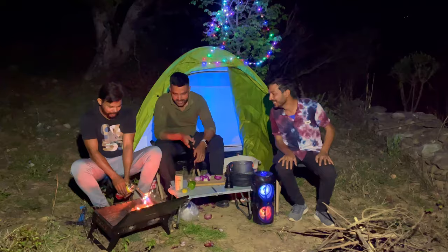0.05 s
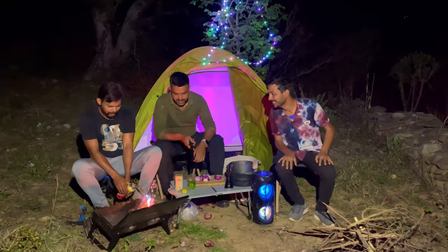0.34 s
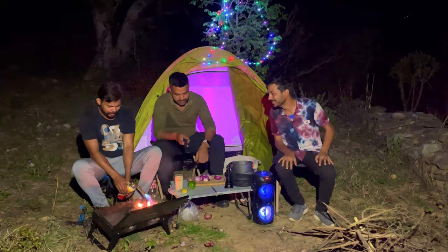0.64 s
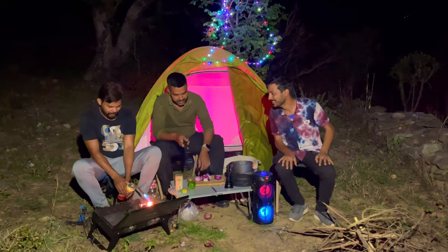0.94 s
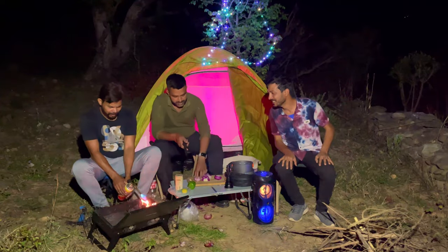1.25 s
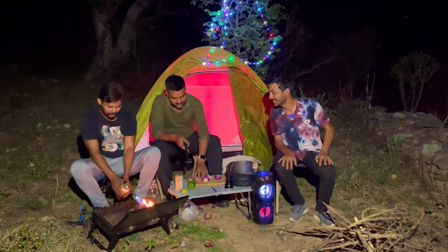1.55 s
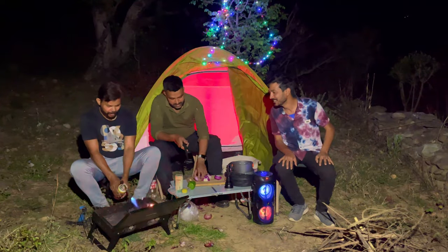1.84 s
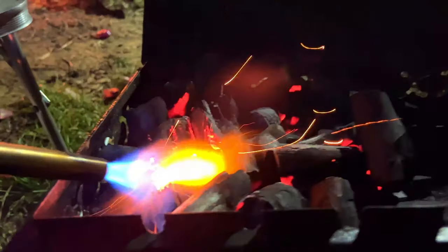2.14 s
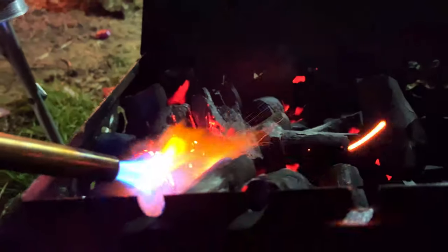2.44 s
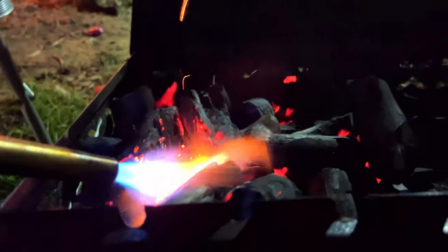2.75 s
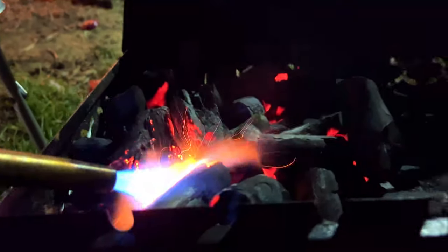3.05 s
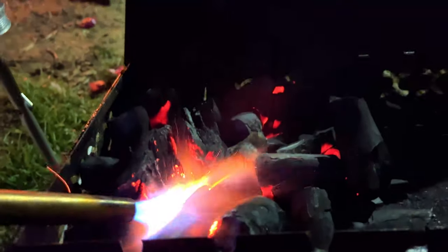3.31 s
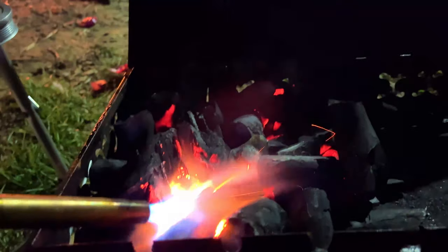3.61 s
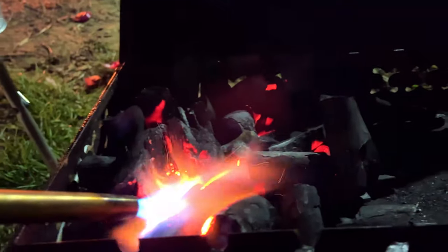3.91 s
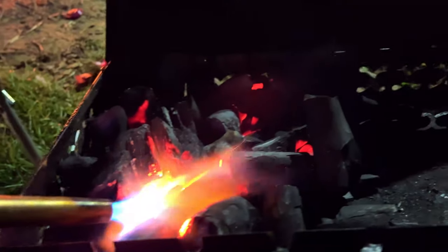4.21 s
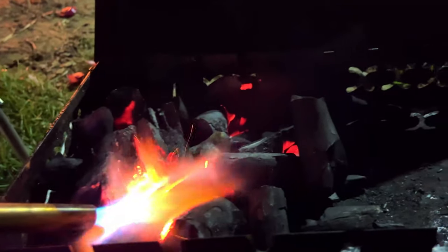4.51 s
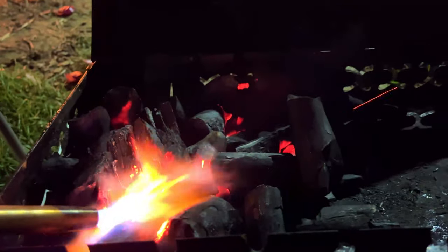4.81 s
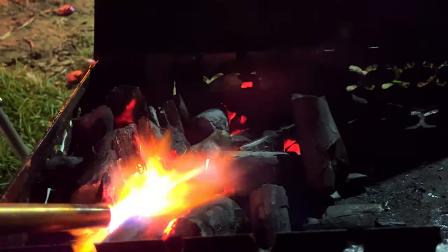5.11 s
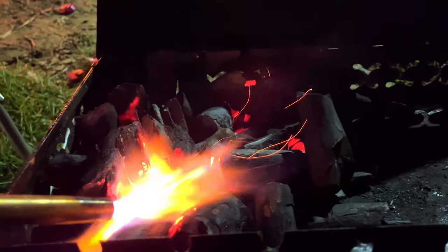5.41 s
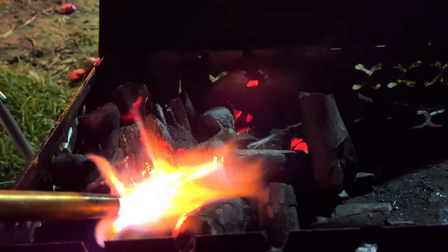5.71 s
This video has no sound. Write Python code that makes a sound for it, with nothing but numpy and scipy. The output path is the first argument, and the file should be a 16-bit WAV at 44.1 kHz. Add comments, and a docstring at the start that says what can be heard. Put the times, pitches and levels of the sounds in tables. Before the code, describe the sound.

A handheld gas torch blows into charcoal in a small grill outdoors. At first it is a few metres away: a moderate, fluttering roar with an airy rush and a thin, ringing gas hiss. It gives one soft low puff at about 0.45 seconds, then flares three times between 0.8 and 1.4 seconds. Just before 2 seconds the sound cuts to a brief silence and swells back quickly, now close and much louder. The deep, full roar slightly overloads the microphone, topped by a bright hiss and a faint breathy tone from the nozzle. Tiny sparks crackle off the charcoal throughout, with sharper snaps at about 2.7 and 3.8 seconds. From around 3.3 seconds the flame reaches deeper into the coals: the roar brightens, the rush grows and the ringing lessens. The blast continues until it stops at about 5.8 seconds.

```python
"""A handheld gas torch blows into charcoal in a small grill outdoors. At first it is a few metres away: the
turbulent flame roars, puffs once and flares, its blast rushes over the coals, and the gas jet hisses and rings
in the burner tube. The scene changes near 2 s and it is heard from close by, where the roar overloads the two-
port microphone. Sparks snap off the charcoal, and as the flame reaches deeper into the coals the roar
brightens, the rush grows and the tube rings less."""
import sys
import numpy as np
from scipy.fft import rfft, irfft, next_fast_len
from scipy.io import wavfile
from scipy.ndimage import map_coordinates

SR = 44100
rng = np.random.default_rng(int(sys.argv[2]) if len(sys.argv) > 2 else 0)


def bounce(signal):
    """Save signal as a 16-bit WAV file at the path given by the first command-line argument."""
    frames = np.transpose(np.atleast_2d(signal))
    limited = np.clip(frames, -1, 1)
    pcm = np.round(limited * 32767).astype(np.int16)
    wavfile.write(sys.argv[1], SR, pcm)


N = 254016
TIME = np.arange(N) / SR


def amp(db):
    """Amplitude ratio of a level in decibels."""
    return 10 ** (np.asarray(db) / 20)


def unit(x):
    """Normalisation to rms 1."""
    return x / np.sqrt(np.mean(x ** 2) + 1e-20)


def along(points, hz):
    """Interpolation of a table's columns on a log frequency axis."""
    freqs, *columns = np.transpose(points)
    return [np.interp(np.log(hz + 1), np.log(freqs + 1), c) for c in columns]


def curves(rows):
    """Linear interpolation of a table's columns in time."""
    times, *columns = np.transpose(rows)
    return [np.interp(TIME, times, c) for c in columns]


def swells(rows):
    """Superposition of Gaussian rises and dips in level, in dB."""
    return sum(db * np.exp(-((TIME - s) / half_width) ** 2) for s, half_width, db in rows)


def wobble(rate):
    """Smooth random modulation: a spline through rate knots a second."""
    knots = rng.standard_normal(int(N * rate / SR) + 4)
    return map_coordinates(knots, [TIME * rate])


def filtered(x, response):
    """Linear filtering: the spectrum of x times a frequency response."""
    size = next_fast_len(N + 8192)
    hz = np.fft.rfftfreq(size, 1 / SR)
    return irfft(rfft(x, size) * response(hz), size)[..., :N]


def colour(spectrum):
    """Frequency response of a spectral envelope."""
    return lambda hz: amp(along(spectrum, hz)[0])


def resonances(modes):
    """Modal superposition: the summed response of peaks with steep skirts."""
    return lambda hz: sum(amp(db) / (1 + ((hz - centre) / width) ** 2) ** 1.5
                          for centre, width, db in modes)


def turbulence(response, image):
    """Partial coherence: shared and opposed noise mix at two ports into stereo of rms 1."""
    size = next_fast_len(N)
    hz = np.fft.rfftfreq(size, 1 / SR)
    balance_db, lead, coherence = along(image, hz)
    angle = np.arccos(np.clip(coherence, 0, 1)) / 2
    shared, opposed = rfft(rng.standard_normal((2, size))) * [np.cos(angle), np.sin(angle)]
    ratio = amp(balance_db)
    left = (shared + opposed) * ratio * np.exp(1j * lead)
    ports = np.array([left, shared - opposed]) / np.hypot(ratio, 1)
    return unit(irfft(ports * response(hz), size)[:, :N])


def echo(x, delay_ms):
    """Propagation delay along a path of changing length."""
    n = np.arange(N)
    return np.array([np.interp(n - delay_ms * SR / 1e3, n, port) for port in x])


def scattered(x, count=5):
    """Interference: weak reflections off coals and walls ripple the spectrum, drifting with the hand."""
    drift = wobble(1.5)
    paths = rng.uniform([1.5, -.1], [10, .1], (count, 2))
    return x + sum(amp(-21) * echo(x, delay_ms + sway_ms * drift) for delay_ms, sway_ms in paths)


# Modes of the grill's box. Each row: frequency in Hz, half-width in Hz, relative level in dB.
GRILL_MODES = [(3160, 230, 0), (4350, 200, -5)]
# Stereo image of the distant grill, rush and flame. Each row: frequency in Hz, left over right in dB,
# left phase lead in radians, coherence from 0 to 1.
FAR_IMAGE = [(100.0, 0.5, -0.5, 1), (328, 1, 0.3, 0.98), (520.0, 2, 0.8, 1), (800.0, 3.5, -0.13, 0.87),
             (1300.0, 2.5, 0.7, 1), (2000.0, 2, 1.1, 0.83), (3020, 1, 0.63, 0.7), (4150, 0, 6.5, 0.217),
             (5030, 25, 2, 0.3), (5830, 16, 10, 1)]
def grill_box(peak_s=1.2, half_width_s=.24, peak_db=-48):
    """Cavity resonance: the box sounds briefly while the distant flame dips into it."""
    envelope = amp(peak_db) * np.exp(-((TIME - peak_s) / half_width_s) ** 2)
    return envelope * turbulence(resonances(GRILL_MODES), FAR_IMAGE)


# A puff of the flame. Each row: centre in seconds, pitch in Hz, envelope peak in dB.
PUFFS = [(.449, 75, -22)]
def puff(half_width_s=0.015):
    """A pressure pulse: a soft, low push of air about two cycles long."""
    return sum(amp(db) * np.exp(-((TIME - s) / half_width_s) ** 2) * np.sin(2 * np.pi * hz * (TIME - s))
               for s, hz, db in PUFFS)


# The loud sparks. Each row: start in seconds, relative level in dB.
SPARKS = [(2.6792, 6.5), (3.7973, 3)]
# Spectrum of a snap. Each row: frequency in Hz, gain in dB.
SNAP_SPECTRUM = [(2000, -28), (4300, 5), (7500, -8), (11000, -4), (15000, -14)]
def sparks(t60_s=0.0073, gain_db=-4, crackle_db=-15, count=50):
    """Impulsive fracture: charcoal bursts off in fast-decaying snaps, two loud among many faint."""
    snaps = np.zeros(N + SR)
    t = np.arange(SR // 10) / SR
    faint = [(NEAR_SPAN_S[0] + .15 + when * 3.6, crackle_db - 10 * softness)
             for when, softness in rng.random((count, 2))]
    for s, db in list(SPARKS) + faint:
        decay = amp(db + gain_db - 60 * t / t60_s)
        snaps[round(s * SR):][:len(t)] += decay * rng.standard_normal(len(t))
    return filtered(snaps, colour(SNAP_SPECTRUM))


# Spectrum of the gas hiss. Each row: frequency in Hz, relative density in dB.
HISS_SPECTRUM = [(3000, -30), (4500, -9), (5600, -3), (6500, -1), (7600, 1), (8300, -3), (10000, -2.5),
                 (11000, -3), (12400, -.5), (14200, .5), (15300, -5)]
# Upper and lower tube modes. Each row: frequency in Hz, half-width in Hz, relative level in dB.
UPPER_MODES = [(9180, 380, 4.5), (11520, 610, -1), (15100, 500, -16)]
LOWER_MODES = [(6024, 230, 0)]
# The gas spurts or sinks. Each row: centre in seconds, half-width in seconds, change in dB.
SPURTS = [(.15, 0.045, 3.5), (.3, 0.086, -6), (.76, 0.059, 2), (1.85, .12, -1), (3.55, .3, -0.1),
          (5.05, 0.22, 0.5), (5.75, .25, -2.5)]
# Stereo image of the jet, with the columns of FAR_IMAGE.
JET_IMAGE = [(4070.0, 8.5, -0.05, 0.75), (5000.0, 5.5, 0.13, 0.28), (6000.0, -0.5, -0.87, 0.83),
             (7200.0, 0.5, -1.88, 0.9), (7900.0, 0.0, -3.09, 0.91), (8650.0, 0.0, -3.16, 0.93),
             (9200.0, -0.5, -3.82, 0.84), (10200.0, 0.0, -4.84, 0.56), (11300.0, 0.0, -6.21, 0.94),
             (12300.0, 0.0, -6.29, 0.97), (13400.0, -0.5, -7.47, 0.82), (14600.0, 0.0, -9.14, 0.77),
             (15300.0, 0.0, -9.42, 0.99)]
def jet(modes, hiss_db, ring_db, upper_db, lower_db, sputter_db):
    """Jet noise: gas hisses from the nozzle, sputtering slightly, and excites the burner tube's modes."""
    hiss_db = hiss_db + swells(SPURTS)
    hiss = amp(hiss_db) * turbulence(colour(HISS_SPECTRUM), JET_IMAGE)
    tube = amp(ring_db) * turbulence(resonances(modes), JET_IMAGE)
    upper = amp(hiss_db + upper_db) * turbulence(resonances(UPPER_MODES), JET_IMAGE)
    lower = amp(hiss_db + lower_db) * turbulence(resonances(LOWER_MODES), JET_IMAGE)
    sputter = amp(sputter_db * unit(wobble(14) + wobble(110)))
    return (hiss + tube + upper + lower) * sputter


# Tube modes heard from afar. Each row: frequency in Hz, half-width in Hz, relative level in dB.
FAR_TUBE_MODES = [(2560, 100, 4.5), (3810, 180, -4.5), (7140, 330, 3.5)]
def far_jet():
    """Forced resonance: the distant tube's ringing partly follows the spurts of gas."""
    ring_db = -40 + 0.47 * swells(SPURTS)
    return jet(FAR_TUBE_MODES, hiss_db=-42.5, ring_db=ring_db,
               upper_db=-3.5, lower_db=-4.5, sputter_db=0.8)


# Tube modes heard close by. Each row: frequency in Hz, half-width in Hz, relative level in dB.
NEAR_TUBE_MODES = [(7180, 490, -1), (13300, 760, -6)]
# The burner's aim. Each row: time in seconds, level of the upper modes in dB relative to the hiss.
AIM = [(2.1, -20), (2.8, -13), (3.35, -2.5), (3.9, -3), (4.3, -7), (4.8, -14), (5.25, -6), (5.75, -10)]
def near_jet(depth):
    """Directivity: the upper modes grow as the mouth turns to the listener; the rest fade with depth."""
    aim_db, = curves(AIM)
    return jet(NEAR_TUBE_MODES, hiss_db=-20, ring_db=-17 - 3.9 * depth,
               upper_db=aim_db, lower_db=-5 - 7.5 * depth, sputter_db=0.84)


# The nozzle's mode. Each row: frequency in Hz, half-width in Hz, relative level in dB.
NOZZLE_MODES = [(4080, 106, 0)]
def nozzle(depth):
    """Narrow resonance: the nozzle gives a wavering, breathy tone that weakens with depth."""
    level_db = -28 - 2.8 * depth + 1.6 * wobble(14)
    return amp(level_db) * turbulence(resonances(NOZZLE_MODES), JET_IMAGE)


def blast(response, image, level_db, rough_db):
    """Flow noise: hot gas tears over the edges of the coals with a rough, rapid flutter."""
    return amp(level_db + rough_db * wobble(160)) * turbulence(response, image)


# Spectrum of the distant rush. Each row: frequency in Hz, relative density in dB.
FAR_RUSH_SPECTRUM = [(900, -51), (1400, -3), (1900, 4), (2600, -9), (3100, -6), (3800, -11), (4400, -12),
                     (5200, -12), (6300, -9), (8000, -50)]
# The flame flares or falters. Each row: centre in seconds, half-width in seconds, change in dB.
FLARES = [(.78, 0.11, 2.5), (1.1, 0.13, 3.5), (1.38, 0.079, 4.5), (1.82, 0.036, -2), (2.72, 0.071, 0),
          (3.16, 0.043, -2.5), (3.27, 0.055, 1)]
def far_rush():
    """Amplitude modulation: the distant rush rises and falls with the flares."""
    return blast(colour(FAR_RUSH_SPECTRUM), FAR_IMAGE, -38 + 0.98 * swells(FLARES), rough_db=1.6)


# Spectrum of the close rush. Each row: frequency in Hz, relative density in dB.
NEAR_RUSH_SPECTRUM = [(1100, -44), (1800, -2), (2200, -2), (2700, -2.5), (3400, 0), (3900, -1.5),
                      (4600, -2.5), (5300, -9.5), (6300, -10), (8000, -50)]
# The hollow between the coals. Each row: frequency in Hz, half-width in Hz, relative level in dB.
HOLLOW_MODES = [(2707, 460, 0)]
# Stereo image of the close rush, with the columns of FAR_IMAGE.
RUSH_IMAGE = [(1830, 7.0, 1.5, 0.05), (2100, 3.5, -1, 0.91), (2700, 1.7, 1.06, 0.66),
              (3300, 7.9, 1.45, 0.55), (3880, 11.5, 1.5, 0.134), (4184, 8.8, -4, 0.85),
              (4570, 6.9, 1.25, 0.64), (5400.0, 2.0, 0, 0.44)]
def near_rush(depth):
    """Flow noise and cavity resonance: a deeper flame drives the coals and their hollow harder."""
    rush = blast(colour(NEAR_RUSH_SPECTRUM), RUSH_IMAGE, -24.5 + 4.4 * depth, rough_db=0.95)
    hollow_db = -33 + 14 * np.minimum(depth, .65)
    return rush + blast(resonances(HOLLOW_MODES), RUSH_IMAGE, hollow_db, rough_db=1.0)


def flame(spectrum, image, roar_db, bright_db, flutter_db, thinning, rumble_hz=260, top_hz=830):
    """Combustion noise flutters with the eddies; a brighter flame gains at the top and loses rumble."""
    roar = turbulence(colour(spectrum), image)
    rumble = filtered(roar, lambda hz: 1 / (1 + (hz / rumble_hz) ** 8))
    body = filtered(roar, lambda hz: 1 / (1 + (hz / top_hz) ** 8))
    middle, top = body - rumble, roar - body
    tilted = amp(-thinning * bright_db) * rumble + middle + amp(bright_db) * top
    return tilted * amp(roar_db + flutter_db * wobble(45))


# Spectrum of the distant roar. Each row: frequency in Hz, relative density in dB.
FAR_ROAR_SPECTRUM = [(22, -27), (45, -11.5), (80, -4.5), (160, -1.5), (310, -1.5), (400, -9), (500, -9.5),
                     (565, -16), (660, -1.5), (950, 2), (1200, -7.5), (1500, -18), (2200, -60)]
# The roar's upper edge. Each row: frequency in Hz, half-width in Hz, relative level in dB.
EDGE_BAND = [(1157, 220, 0)]
# The flame's brightness. Each row: time in seconds, gain of the upper edge in dB.
FAR_BRIGHTNESS = [(.4, 6.5), (1.1, -5.5), (1.6, -9), (1.9, 0)]
def far_flame():
    """Spectral tilt: the distant roar dulls and its edge fades as the flame is lowered into the grill."""
    roar_db = -26.5 + swells(FLARES)
    bright_db, = curves(FAR_BRIGHTNESS)
    roar = flame(FAR_ROAR_SPECTRUM, FAR_IMAGE, roar_db, 0.15 * bright_db, flutter_db=0.5, thinning=0.091)
    edge = amp(roar_db - 14 + bright_db) * turbulence(resonances(EDGE_BAND), FAR_IMAGE)
    return roar, edge


# Spectrum of the close roar. Each row: frequency in Hz, relative density in dB.
NEAR_ROAR_SPECTRUM = [(22, -39), (40, -18), (72, -4), (150, -0.3), (240, -1.5), (305, 0), (360, -2.5),
                      (490, -3.5), (670, -1.5), (950, -9), (1250, -9), (1550, -16.5), (1850, -31.5),
                      (2600, -63)]
# Stereo image of the close roar, with the columns of FAR_IMAGE.
ROAR_IMAGE = [(100.0, 0.5, 0.12, 1), (334, 1.6, 0.34, 0.99), (493, -0.7, 0.45, 0.96),
              (720, 4.5, 1.17, 0.96), (910, 10, 0.9, 0.92), (1020, 3, 0.85, 0.84), (1363, 1.5, 2.77, 1),
              (1604, -6, 2.83, 0.84), (1780, 8, 2.9, 0.05)]
def near_flame(depth):
    """Spectral tilt: the full, wavering roar at the grill's rim brightens with depth."""
    roar_db = -6.5 + swells(FLARES) + 0.29 * wobble(9)
    bright_db = -0.76 + 3.3 * depth
    return flame(NEAR_ROAR_SPECTRUM, ROAR_IMAGE, roar_db, bright_db, flutter_db=0.36, thinning=1.0)


# Echoes off the ground. Each row: time in seconds, delay of the roar in ms, delay of the rush in ms.
ECHO_DELAYS = [(0, .3, .8), (.45, .32, .81), (.8, .375, .83), (1.2, .42, .88), (1.9, .43, .89)]
def far_torch():
    """Comb filtering: echoes notch the distant torch, and the notches slide down as the paths grow."""
    roar, edge = far_flame()
    rush = far_rush()
    roar_ms, rush_ms = curves(ECHO_DELAYS)
    echoes = amp(-5) * echo(roar, roar_ms) + amp(-7) * echo(rush, rush_ms)
    return roar + edge + echoes + scattered(rush + grill_box() + far_jet()) + puff()


# The close flame's reach into the coals. Each row: time in seconds, depth from 0 to 1.
DEPTH = [(2.5, 0.22), (3.1, 0.27), (3.35, 0.73), (4.3, 0.6), (5.05, 1), (5.75, 0.92)]
def near_torch():
    """Superposition: roar, rush, nozzle and jet all follow the flame's depth, while sparks snap."""
    depth, = curves(DEPTH)
    roar = near_flame(depth)
    rush = near_rush(depth)
    return roar + nozzle(depth) + scattered(rush + near_jet(depth)) + sparks()


def gate(span, fade_s, start_db, edge_s=0.00098):
    """A time window that fades in from start_db and stops dead at the end of its span."""
    start, end = span
    fade = np.interp(TIME, [start, start + fade_s], [amp(start_db), 1])
    return fade * np.clip(np.minimum(TIME - start, end - TIME) / edge_s, 0, 1)


FAR_SPAN_S, NEAR_SPAN_S = (0, 1.937), (1.984, 5.8)
def scene():
    """Two listening distances in turn, far then near, with a short silence between."""
    far = gate(FAR_SPAN_S, fade_s=0.11, start_db=-10.5) * far_torch()
    near = gate(NEAR_SPAN_S, fade_s=0.13, start_db=-33) * near_torch()
    return far + near


BAND_LIMIT_HZ = 15500
def record(dry):
    """Hard clipping at full scale flattens the peaks; nothing passes above the band limit."""
    clipped = np.clip(dry, -1, 1)
    return filtered(clipped, lambda hz: hz < BAND_LIMIT_HZ)


dry = scene()
out = record(dry)
bounce(out)
```